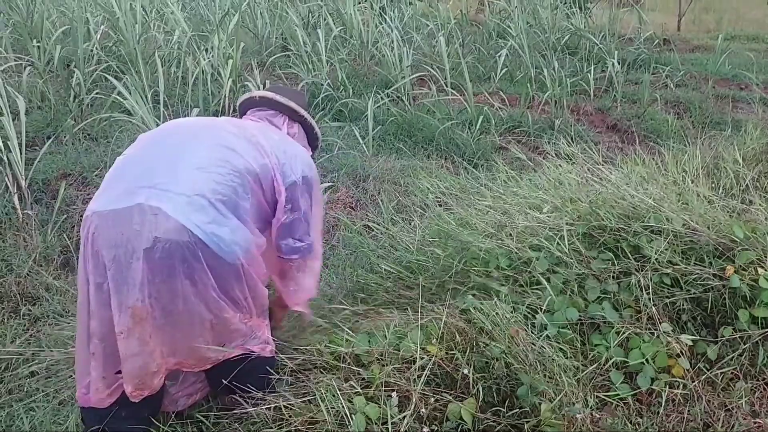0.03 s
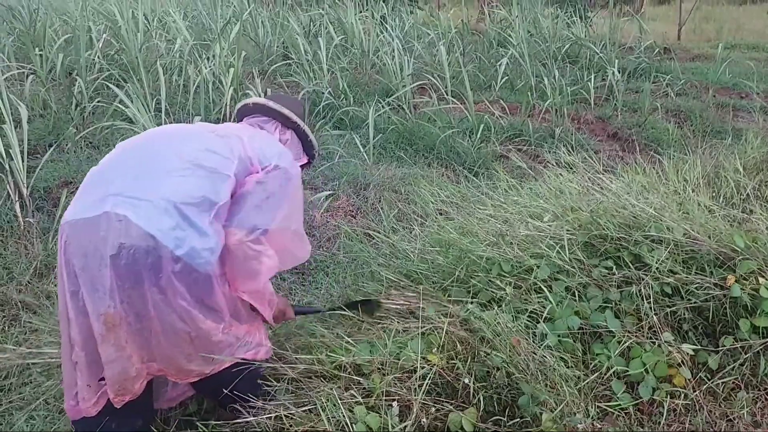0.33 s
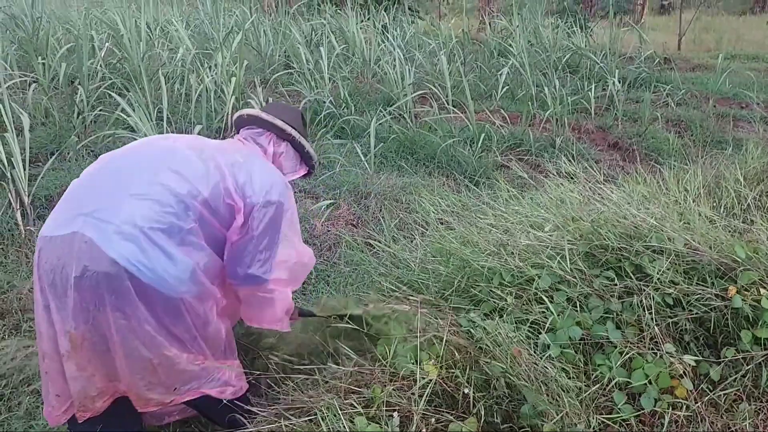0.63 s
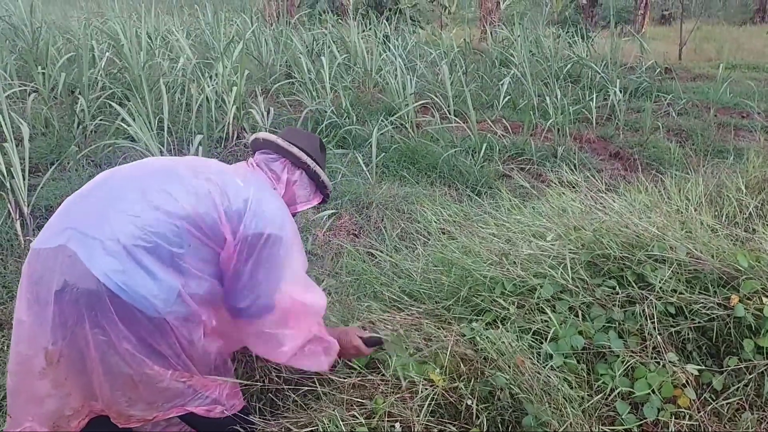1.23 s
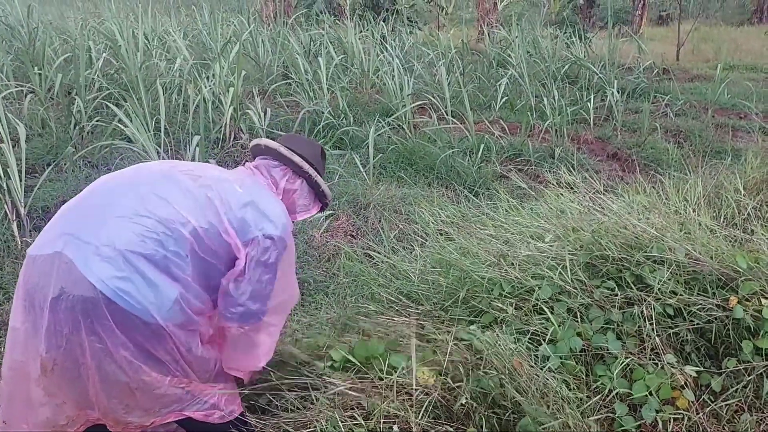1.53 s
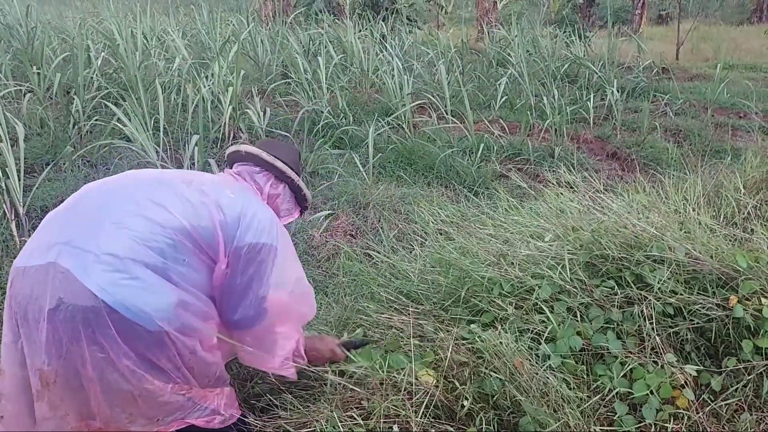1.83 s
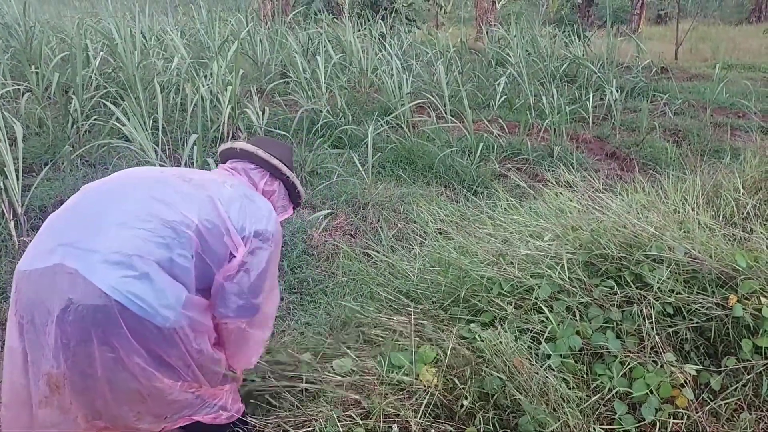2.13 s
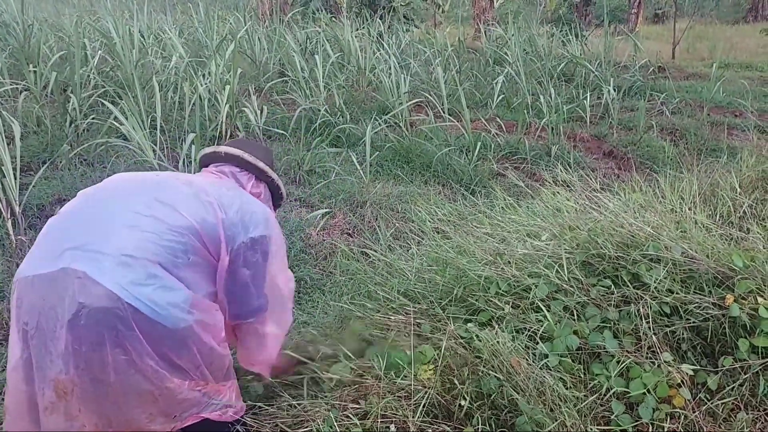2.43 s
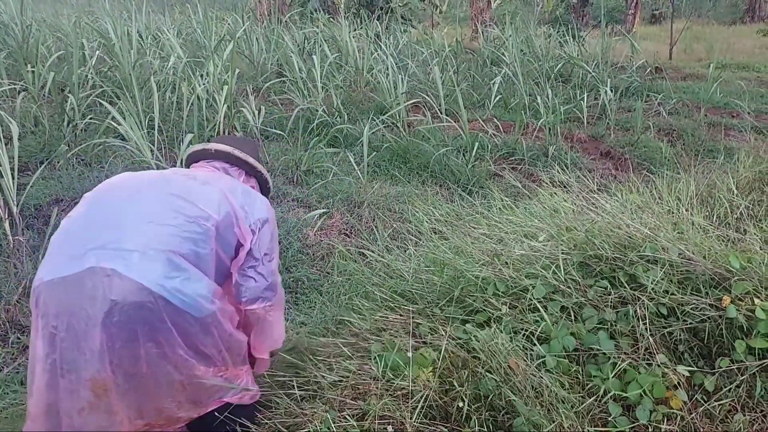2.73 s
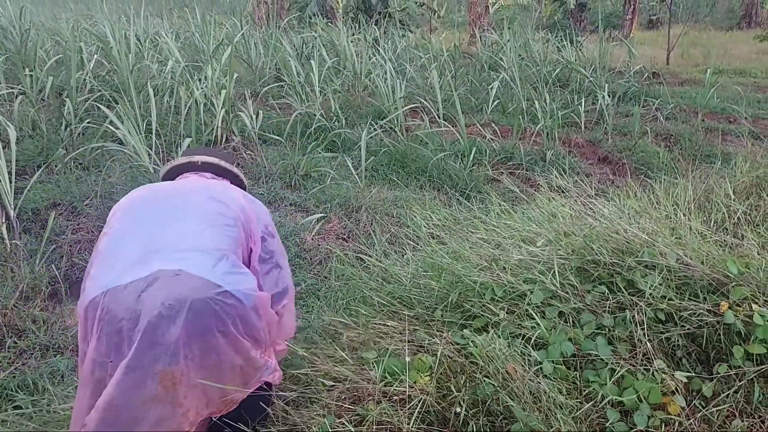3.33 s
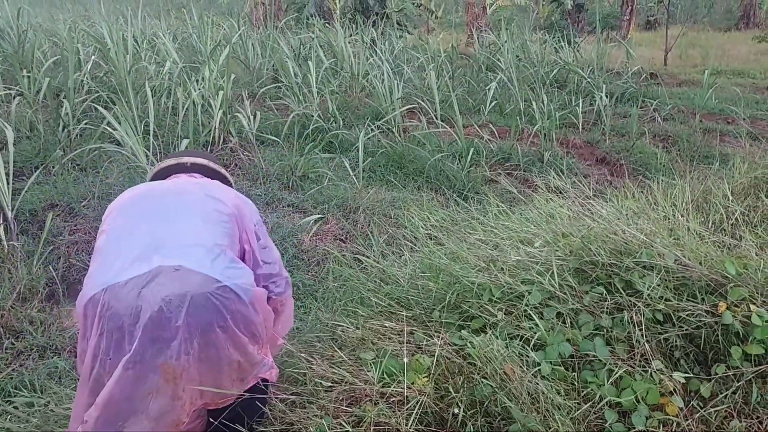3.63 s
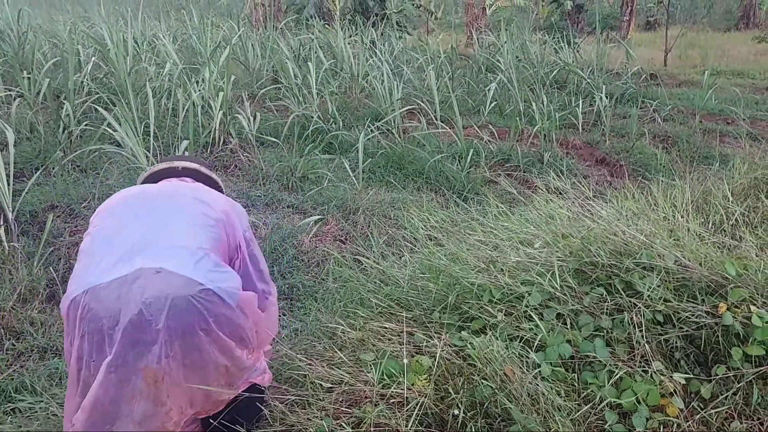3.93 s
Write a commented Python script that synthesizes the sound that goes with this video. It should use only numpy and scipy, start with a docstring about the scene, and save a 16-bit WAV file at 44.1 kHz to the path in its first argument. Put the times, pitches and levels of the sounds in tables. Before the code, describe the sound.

A hand blade tears through rustling tall grass while crickets chirp in a field.

```python
"""Tall grass is cut with a hand blade in an open field, over a low distant rumble and an insect chorus.
From the start, about twice a second, a stroke tears through stems: fibres break, leaves hiss, the blade
rings. Between strokes the gathered grass rustles. A near cricket, then a far one, joins in and chirps
throughout, one falling tone to each wing stroke. At 1.4 s a thick stalk cracks and rings; from 1.8 s
come thin rising peeps, perhaps a small bird farther off."""
import sys
import numpy as np
from scipy import signal
from scipy.fft import rfft, irfft
from scipy.io import wavfile

SR = 44100
rng = np.random.default_rng(int(sys.argv[2]) if len(sys.argv) > 2 else 0)


def digitize_waveform(pressure):
    """Quantize a signal to 16-bit integers and store it at the path in sys.argv[1].

    Rows of a 2-D input are taken as channels; values are limited to [-1, 1].
    """
    field = np.atleast_2d(pressure).T
    bounded = np.clip(field, -1, 1)
    quanta = np.round(bounded * 32767).astype(np.int16)
    wavfile.write(sys.argv[1], SR, quanta)


N = 176400
TIME = np.arange(N) / SR
FREQUENCY = np.arange(N // 2 + 1) * SR / N
STEM_LIKENESS, LEAF_LIKENESS = 0.42, 0.1   # correlation of left and right


def from_db(db):
    """The decibel scale: amplitude grows tenfold every 20 dB."""
    return 10 ** (np.asarray(db) / 20)


def rms_one(x):
    """Normalisation to unit mean power."""
    return x / np.sqrt(np.mean(x ** 2) + 1e-20)


def pan(db):
    """Interaural level difference: gains for left and right; positive favours the left."""
    return from_db([[db / 2], [-db / 2]])


def colour(x, spectrum):
    """Spectral shaping by a curve interpolated over log frequency; unit power."""
    hz, db = np.transpose(spectrum)
    gain = from_db(np.interp(np.log(np.maximum(FREQUENCY, 1)), np.log(hz), db))
    return rms_one(irfft(rfft(x) * gain, N))


def drift(per_s):
    """Random modulation: straight lines between Gaussian values; unit power."""
    knots = rng.standard_normal(int(per_s * N / SR) + 2)
    return rms_one(np.interp(TIME * per_s, np.arange(len(knots)), knots))


def noise(likeness):
    """Partial coherence: each side mixes a common white noise with its own."""
    white = rng.standard_normal((3, N))
    return np.sqrt(likeness) * white[0] + np.sqrt(1 - likeness) * white[1:]


def swell(centre, half, edge=2):
    """A power envelope: Gaussian at edge 2, more abrupt above."""
    return np.exp(-np.minimum(np.abs((TIME - centre) / half) ** edge, 20))


def resonate(x, modes):
    """Modal superposition: unit white noise leaves each resonance at its listed level."""
    return sum((-1) ** k * from_db(db) * np.sqrt(SR / (np.pi * width))
               * signal.lfilter(*signal.iirpeak(hz, hz / width, fs=SR), x)
               for k, (hz, width, db) in enumerate(modes))


def breaks(per_s, spread_db, likeness):
    """Fracture as a Poisson process: clicks of uneven size at random moments; unit power."""
    sizes = from_db(spread_db * np.minimum(rng.exponential(1, N), 4))
    return rms_one((rng.random(N) < per_s / SR) * sizes * noise(likeness))


def fibres(likeness, break_share=0.38, snap_db=-10.5):
    """Fracture and friction: tiny fibre breaks and a few snapping stems over sliding leaves."""
    tearing = np.sqrt(break_share) * breaks(per_s=5000, spread_db=2, likeness=likeness)
    sliding = np.sqrt(1 - break_share) * noise(likeness)
    snaps = from_db(snap_db) * breaks(per_s=220, spread_db=3.5, likeness=likeness)
    return tearing + sliding + snaps


def patchy(x, depth_db=2):
    """Independent modulation of narrow bands: each stem has its own pitch, so the colour shifts."""
    edges = np.r_[0, np.geomspace(700, 15000, num=30), SR]
    spectrum = rfft(x)
    bands = (irfft(spectrum * ((FREQUENCY >= lo) & (FREQUENCY < hi)), N)
             for lo, hi in zip(edges, edges[1:]))
    return sum(band * from_db(depth_db * drift(per_s=35)) for band in bands)


def grass_envelopes(fall_db_per_s=259, flicker_db=0.28):
    """Incoherent sources add in power: cuts, tufts and rustles set the stem, leaf and blade amplitudes."""
    # blade strokes: (time [s], attack [s], time to fall [s], stems [dB], leaves [dB], blade [dB])
    cuts = [(-.006, .006, 0.025, -36, -32, -38), (.511, .004, 0.047, -44, -44, -54),
            (1.389, 0.0075, 0.054, -31.5, -31, -50), (1.967, .014, .052, -32, -31, -37.5),
            (2.494, 0.0057, 0.039, -36, -34, -55), (2.99, 0.024, 0.063, -45, -40.5, -50.5),
            (3.566, .008, .014, -57, -54, -52)]
    # grass gathered and dragged: (time [s], half length [s], stems [dB], leaves [dB])
    rustles = [(0.054, 0.055, -43.5, -45.5), (0.228, .12, -49.5, -52.5), (.39, 0.088, -56.5, -68),
               (.635, .06, -46, -47.5), (0.754, 0.078, -52, -56), (0.961, 0.17, -54, -55.5),
               (1.232, 0.048, -53.5, -60), (1.31, .06, -45.5, -52), (1.592, .11, -50, -55.5),
               (1.76, 0.06, -56, -63), (1.884, 0.068, -45.5, -52), (2.105, 0.086, -49, -54),
               (2.253, 0.08, -51.5, -50.5), (2.42, 0.069, -48, -54.5), (2.589, 0.062, -45.5, -51),
               (2.71, 0.086, -52, -58), (2.925, 0.12, -50, -53.5), (3.194, .07, -53.5, -58),
               (3.33, .07, -60.5, -66), (3.461, 0.06, -55, -61), (3.605, 0.075, -53, -55.5),
               (3.74, .12, -65.5, -67.5), (3.955, 0.11, -59, -64)]
    # tufts that give way at once: (time [s], half length [s], stems [dB], leaves [dB])
    tufts = [(0.485, 0.013, -45.5, -57), (0.505, 0.0043, -53, -54), (.519, 0.0053, -42.5, -43),
             (0.543, 0.0046, -44, -41), (.573, .005, -55, -43), (.847, 0.0024, -47.5, -44.5),
             (1.1, .012, -63, -50.5), (1.374, 0.01, -42, -40), (1.404, 0.0084, -25, -24.5),
             (1.962, 0.006, -45, -43), (1.987, .004, -36, -29.5), (2.484, 0.0032, -42.5, -32.5),
             (2.977, 0.0055, -49, -41.5), (3.098, 0.0049, -37.5, -52), (3.113, 0.025, -43.5, -50),
             (3.534, 0.0044, -52, -52)]
    power = np.zeros((3, N))   # stems, leaves, blade
    for start, attack, hold, *db, ring_db in cuts:
        t = TIME - start
        shape = np.clip(t / attack, 0, 1) * from_db(-fall_db_per_s * np.maximum(t - hold, 0))
        power[:2] += np.outer(from_db(db), shape) ** 2
        power[2] += from_db(ring_db) ** 2 * swell(start + hold / 2, hold / 2)
    for centre, half, *db in rustles:
        power[:2] += np.outer(from_db(db) ** 2, swell(centre, half, edge=2.9))
    for centre, half, *db in tufts:
        power[:2] += np.outer(from_db(db) ** 2, swell(centre, half))
    return np.sqrt(power) * from_db(flicker_db * drift(per_s=120))


def blade_ring(envelope):
    """Forced vibration: scraping drives the modes of the blade."""
    # blade modes: (frequency [Hz], bandwidth [Hz], relative level [dB])
    modes = [(1720, 190, -4.5), (3200, 160, -11.5), (4060, 120, -14), (12000, 250, -11), (14100, 160, -9)]
    return resonate(envelope * noise(STEM_LIKENESS), modes)


def grass(lag_samples=3):
    """Source and filter: breaking, sliding fibres take the colours of stems and leaves; the blade rings."""
    # spectrum of the stem crunch: (frequency [Hz], relative density [dB])
    stem_spectrum = [(300, 1), (600, -6), (900, -6), (1300, -2.5), (1650, 2.5), (2000, -1.5), (2400, -2),
                     (3200, -1.5), (5000, 1), (6800, -0.5), (8300, -10), (11000, -12.5), (15500, -8)]
    # spectrum of the leaf hiss: (frequency [Hz], relative density [dB])
    leaf_spectrum = [(1500, -36), (4000, -18), (7000, -3.5), (8400, -6), (9600, -2), (11300, -1.5),
                     (12400, -1), (13900, -0.5), (15500, -1.5)]
    stems, leaves, blade = grass_envelopes()
    crunch = stems * colour(patchy(fibres(STEM_LIKENESS)), stem_spectrum)
    ring = blade_ring(blade)
    hiss = leaves * colour(patchy(fibres(LEAF_LIKENESS)), leaf_spectrum)
    left, right = pan(db=-4) * (crunch + ring + thick_stalk()) + pan(db=-1) * hiss
    return np.array([left, np.roll(right, lag_samples)])


def rumble(gain_db=1):
    """Amplitude modulation: two low bands of noise swell and ebb, nearly alike on both sides."""
    # course of the rumble: (time [s], relative deep level [dB], relative upper level [dB])
    levels = [(0, -41.5, -44.5), (.16, -32.5, -39.5), (.45, -31.5, -36.5), (.66, -32, -36.5),
              (.83, -30.5, -31.5), (1.14, -35, -37), (1.4, -29, -32.5), (1.54, -33, -39.5),
              (1.68, -30, -42), (1.92, -34, -38.5), (2.25, -31.5, -31), (2.55, -32, -33),
              (2.85, -32, -35.5), (3.3, -35, -42), (3.65, -39, -46.5), (3.86, -41.5, -47), (4, -37, -49)]
    # deep band: (frequency [Hz], relative density [dB])
    deep_spectrum = [(20, -34), (32, -22), (45, -8), (60, -2), (82, -0.5), (125, -0.5), (160, -5.5),
                     (220, -22), (400, -60.5)]
    # upper band: (frequency [Hz], relative density [dB])
    upper_spectrum = [(110, -23), (165, -6.5), (200, 0.5), (245, 2), (290, -4.5), (350, -11.5), (420, -18),
                      (520, -23.5), (700, -36.5), (1200, -46.5), (3000, -68)]
    times, deep_db, upper_db = np.transpose(levels)
    deep = from_db(np.interp(TIME, times, deep_db)) * colour(noise(likeness=0.98), deep_spectrum)
    upper = from_db(np.interp(TIME, times, upper_db)) * colour(noise(likeness=0.93), upper_spectrum)
    return from_db(gain_db) * (deep + upper)


def open_air(level_db=-58.5):
    """A diffuse field: faint steady noise, largely different at each ear."""
    # open-air background: (frequency [Hz], relative density [dB])
    spectrum = [(400, 25), (900, -17), (1700, 5), (2500, -6.5), (5000, -3.5), (9000, -8.5), (15500, -18)]
    return from_db(level_db) * colour(noise(likeness=0.16), spectrum)


def insect_chorus(level_db=-63, flicker_db=4):
    """Incoherent summation: many far insects merge into a flickering band of noise."""
    # band of the chorus: (frequency [Hz], relative density [dB])
    spectrum = [(4500, -19.5), (5600, -11), (6150, 0), (6500, -4.5), (7200, -21), (9000, -30)]
    envelope = from_db(level_db + flicker_db * drift(per_s=70))
    return envelope * colour(noise(likeness=0.18), spectrum)


def glide(centre, length, hz, sweep_hz, waver_hz):
    """Frequency modulation: a short tone slides and wavers under a cosine envelope."""
    tone = np.zeros(N)
    on = np.abs(TIME - centre) < length / 2
    position = (TIME[on] - centre) / length
    waver = np.interp(position, np.linspace(-.5, .5, num=16), rng.standard_normal(size=16))
    pitch = hz + sweep_hz * position + waver_hz * waver
    phase = 2 * np.pi * (np.cumsum(pitch) / SR + rng.random())
    tone[on] = np.sqrt(2) * np.cos(np.pi * position) * np.sin(phase)
    return tone


def scatter(call, tail_db=-8.5, t60_s=0.09):
    """Scattering by the surrounding plants adds a short diffuse tail to a call."""
    t = TIME[:SR // 2]
    tail = rng.standard_normal((2, len(t))) * from_db(-60 * t / t60_s)
    tail /= np.sqrt(np.sum(tail ** 2, axis=1, keepdims=True))
    return call + from_db(tail_db) * signal.fftconvolve(call[None], tail, axes=1)[:, :N]


def cricket(chirps, wings, hz, fall_hz, spread_db=0.65):
    """Stridulation: each wing stroke is a falling tone; short chirps stop after the first strokes."""
    song = np.zeros(N)
    for time, count, chirp_db in chirps:
        for delay, length, wing_db in wings[:count]:
            gain = from_db(chirp_db + wing_db + spread_db * rng.normal())
            pitch = hz * rng.normal(1, 0.009)
            song += gain * glide(time + delay, length, pitch, sweep_hz=-fall_hz, waver_hz=168)
    return song


def near_cricket():
    """Stridulation close by: the wing strokes grow longer and louder within a chirp."""
    # chirps: (time [s], wing strokes [count], gain [dB])
    chirps = [(.119, 2, -3), (.222, 5, -5), (.396, 2, -2), (.618, 5, -4), (.792, 2, -0.5), (.913, 2, -1),
              (1.024, 3, -3.5), (1.135, 5, -3), (1.321, 2, -2.5), (1.555, 5, -2.5), (1.728, 2, -1.5),
              (1.832, 2, -0.5), (1.929, 5, -3), (2.111, 2, -2), (2.228, 2, -1.5), (2.361, 5, -3),
              (2.612, 2, -1), (2.744, 2, 0), (2.846, 5, -3), (3.038, 2, -1), (3.147, 2, -2.5),
              (3.245, 5, -3), (3.432, 2, -2), (3.552, 2, -3), (3.651, 5, -3), (3.826, 2, -1.5),
              (3.941, 2, -2.5)]
    # wing strokes of a chirp: (delay [s], length [s], level [dB])
    wings = [(0, .005, -42.5), (.0095, .007, -38.5), (.018, .008, -36), (.03, .011, -32),
             (.045, .012, -32.5)]
    return pan(db=-2) * scatter(cricket(chirps, wings, hz=6003, fall_hz=1110))


def far_cricket():
    """Stridulation farther off: fainter, slightly higher chirps of up to three strokes."""
    # chirps: (time [s], wing strokes [count], gain [dB])
    chirps = [(.258, 3, 2), (.41, 3, -4), (.473, 1, 0), (.55, 3, 1), (.66, 3, 3), (.835, 2, 1),
              (.926, 3, 2), (1.063, 3, 2.5), (1.236, 3, 3.5), (1.475, 2, 3), (1.63, 2, -1), (1.725, 3, -5),
              (1.898, 3, 4), (2.258, 2, 9), (2.648, 3, 4), (2.905, 1, 10), (3.058, 2, 5), (3.211, 3, 4.5),
              (3.386, 1, 1), (3.449, 2, 5), (3.572, 3, 4.5), (3.84, 2, 5), (3.904, 3, 3)]
    # wing strokes of a chirp: (delay [s], length [s], level [dB])
    wings = [(0, .009, -56.5), (.013, .012, -53), (.028, .013, -51.5)]
    return pan(db=-3) * scatter(cricket(chirps, wings, hz=6480, fall_hz=915))


def thick_stalk(tear_s=1.404, tear_db=-33, crack_s=1.405, crack_db=-15, decay_s=0.0002):
    """Transient excitation: tearing rings the modes of a thick stalk, which parts with a sharp crack."""
    # stalk modes: (frequency [Hz], bandwidth [Hz], relative level [dB])
    modes = [(610, 49, -9), (950, 130, -17), (1280, 70, -9), (2040, 200, 0), (2870, 70, -2.5),
             (3034, 48, 2), (3220, 60, -2), (3470, 76, 1), (3690, 76, -2), (4050, 70, 2.5),
             (5100, 200, 2.5), (6750, 200, 0.5), (10900, 300, -10), (14500, 130, 7)]
    t = TIME - crack_s
    decay = (t >= 0) * np.exp(-np.clip(t / decay_s, 0, 20))
    crack = from_db(crack_db) * decay * noise(STEM_LIKENESS)
    tear = from_db(tear_db) * np.sqrt(swell(tear_s, half=0.0072)) * fibres(STEM_LIKENESS)
    return crack + resonate(tear, modes)


def peeps():
    """Frequency sweeps: thin rising tones, perhaps a small bird, scattered by the plants."""
    # peeps: (time [s], level [dB])
    calls = [(1.795, -63), (2.255, -52), (2.752, -54.5), (3.257, -51), (3.515, -53.5), (3.733, -54)]
    return scatter(sum(from_db(db) * glide(time, length=0.027, hz=7790, sweep_hz=300, waver_hz=300)
                       for time, db in calls))


def scene():
    """Superposition: grass cutting in front, the field around."""
    return grass() + rumble() + open_air() + insect_chorus() + near_cricket() + far_cricket() + peeps()


def record(dry, cutoff_hz=15600):
    """Band limiting: a steep elliptic low-pass removes the highest treble."""
    return signal.sosfilt(signal.ellip(12, .1, 80, cutoff_hz, fs=SR, output="sos"), dry)


dry = scene()
out = record(dry)
digitize_waveform(out)
```